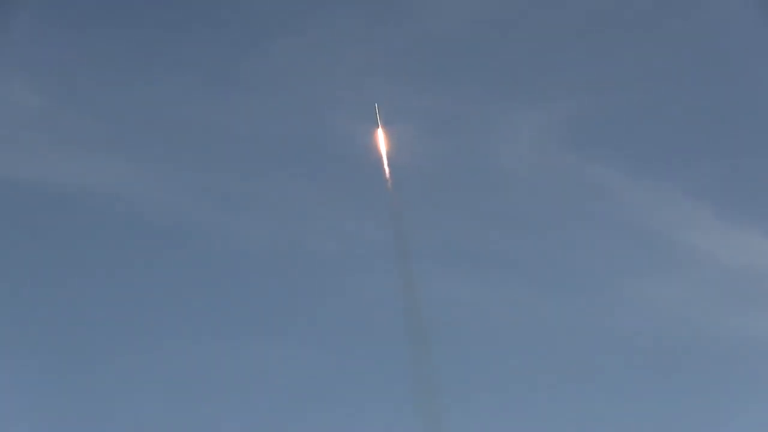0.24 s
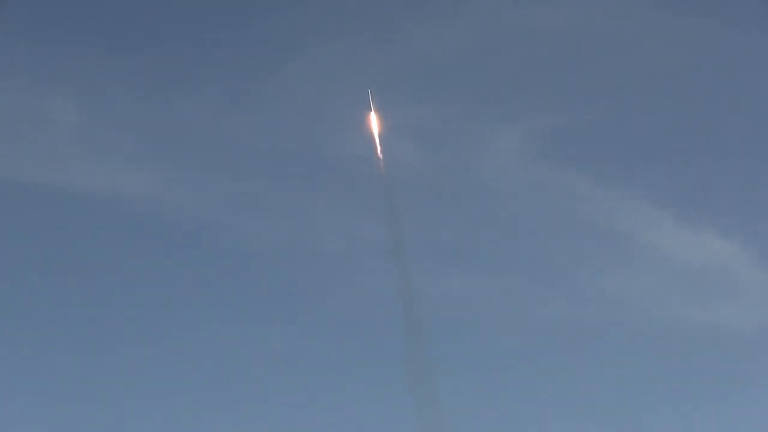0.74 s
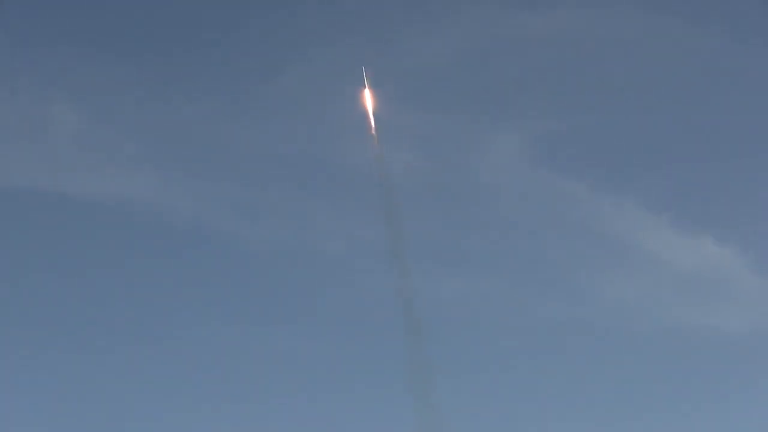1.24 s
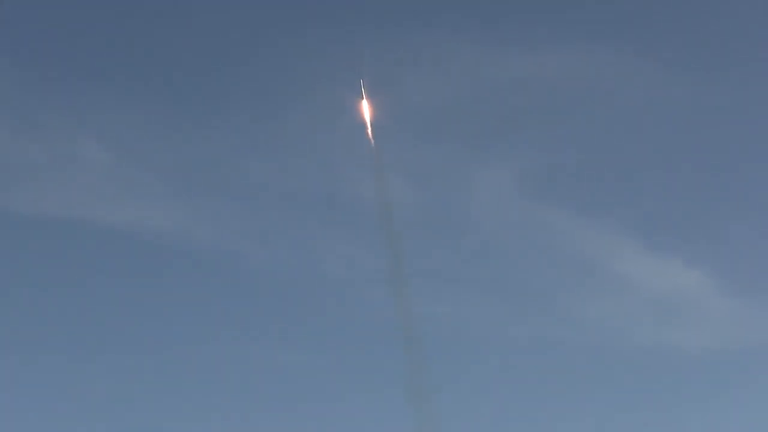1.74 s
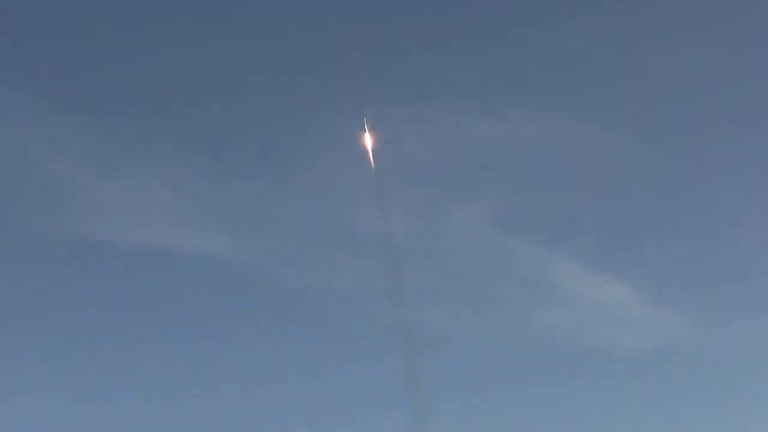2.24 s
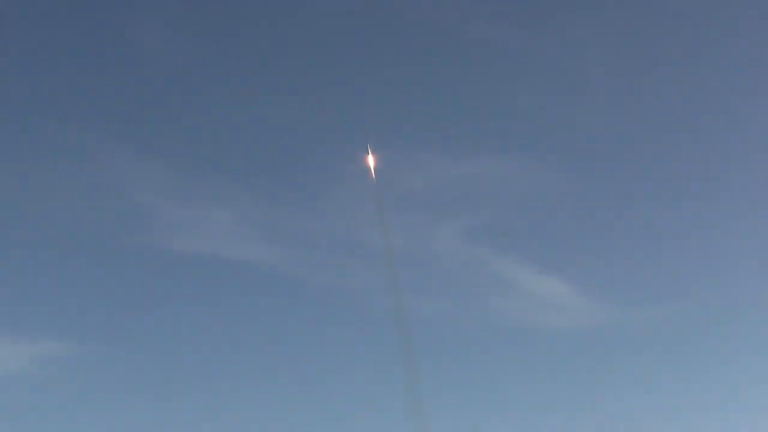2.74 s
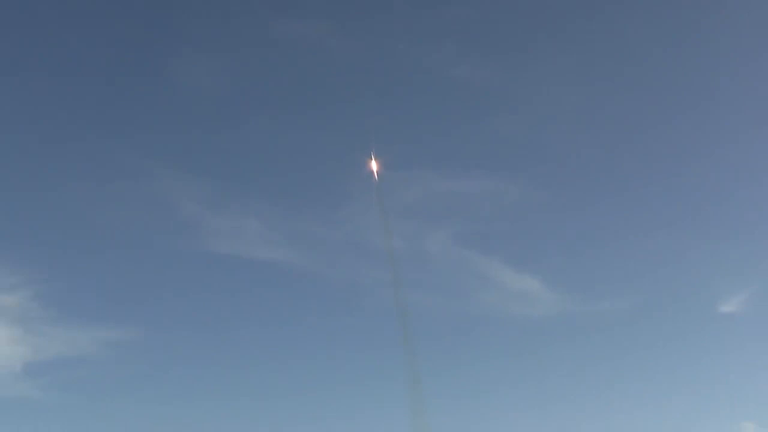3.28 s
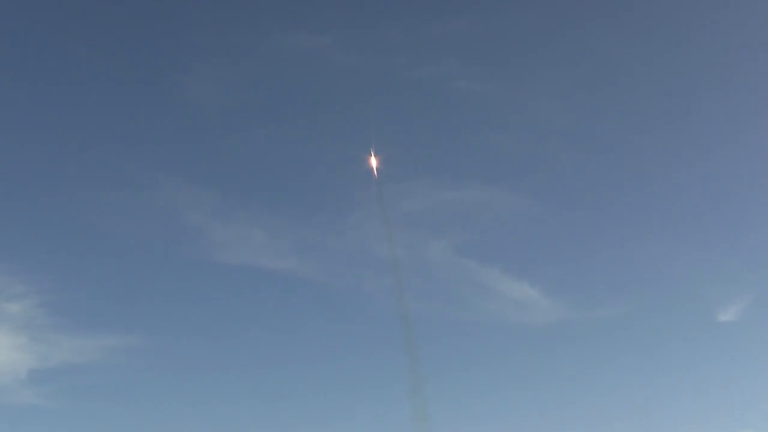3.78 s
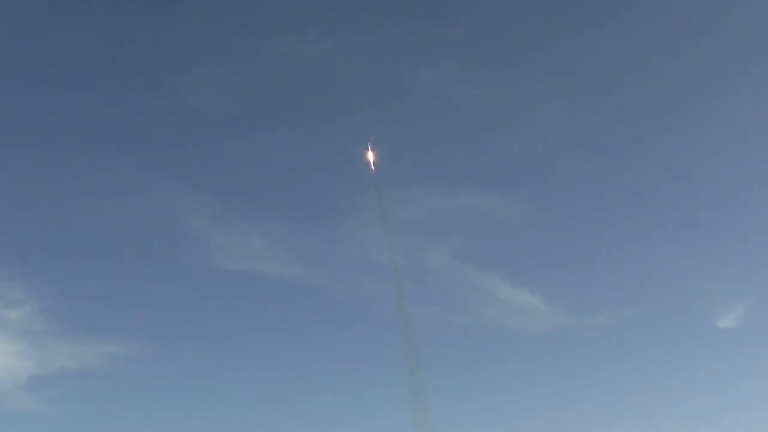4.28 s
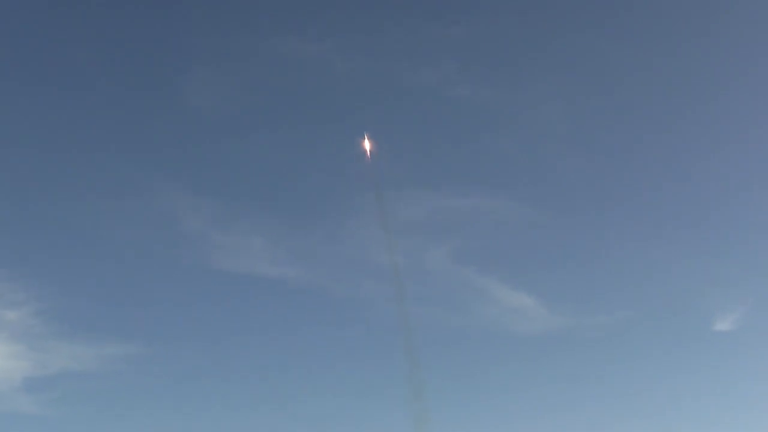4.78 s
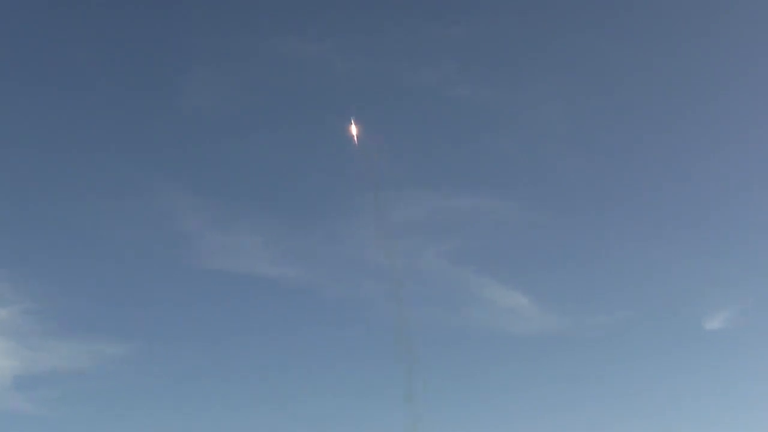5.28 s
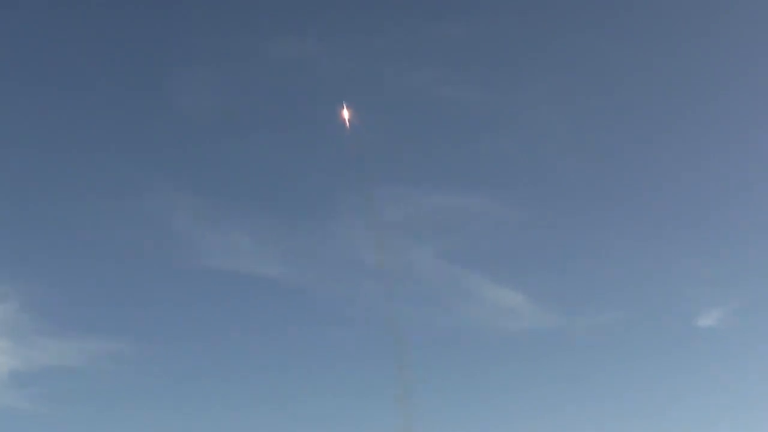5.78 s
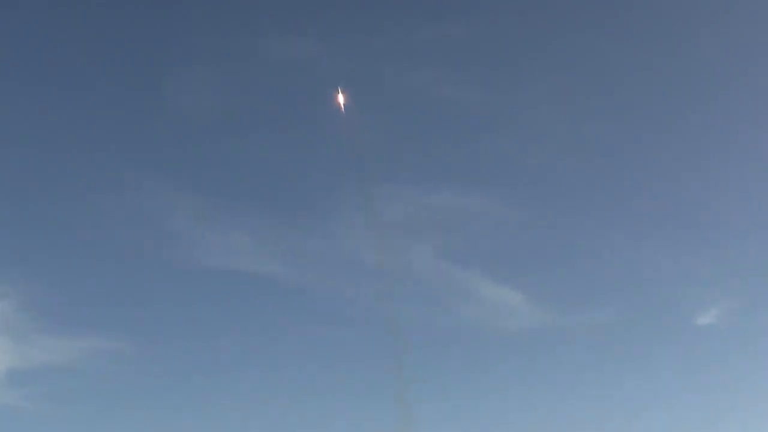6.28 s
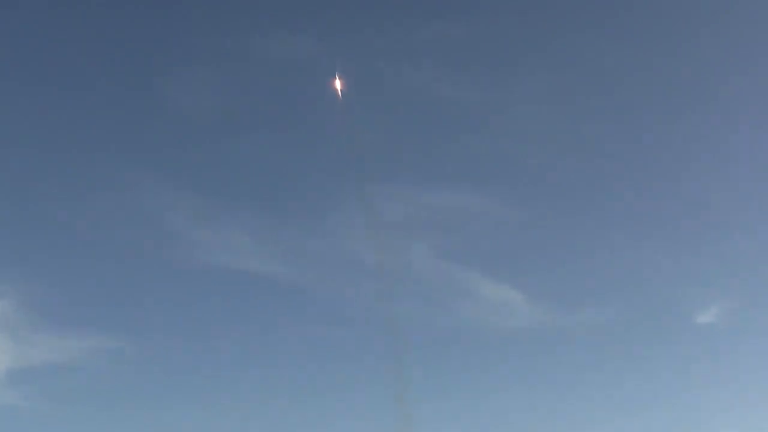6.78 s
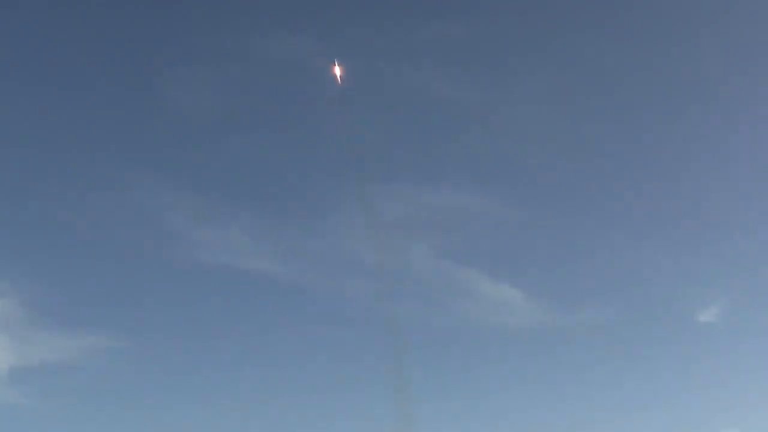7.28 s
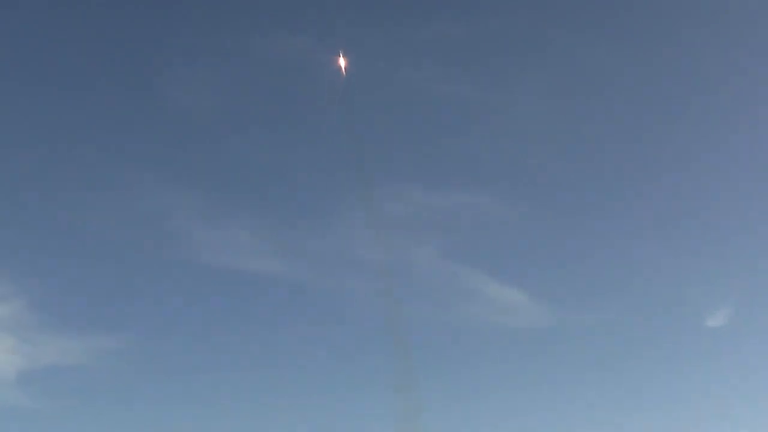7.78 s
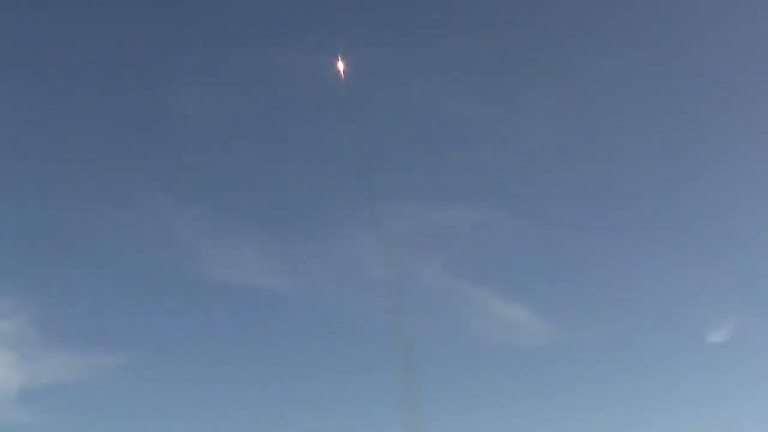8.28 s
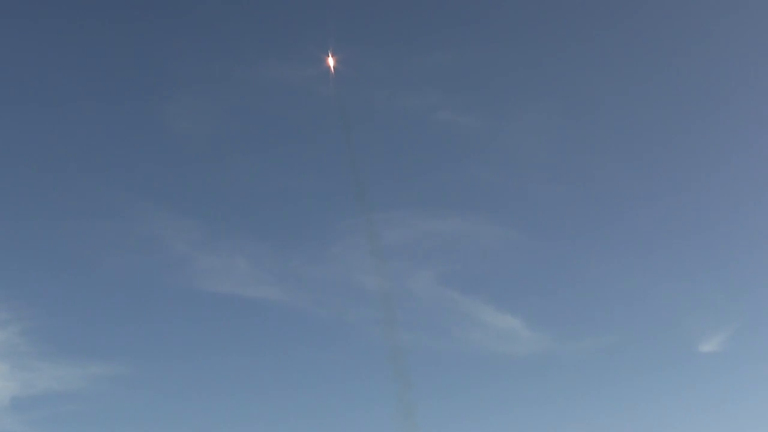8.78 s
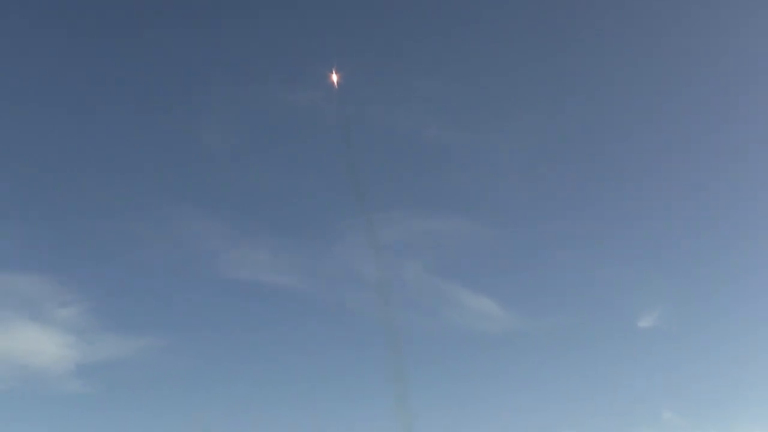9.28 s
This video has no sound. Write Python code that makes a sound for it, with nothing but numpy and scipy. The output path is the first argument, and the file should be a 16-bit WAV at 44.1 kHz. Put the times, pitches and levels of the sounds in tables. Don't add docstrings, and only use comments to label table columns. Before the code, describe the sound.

A rocket climbing far overhead outdoors: deep rumble and broad roar, with dense, irregular crackle building on top, then small plastic rattles near the end.

```python
import sys
import numpy as np
from scipy import signal
from scipy.fft import rfft, irfft, next_fast_len
from scipy.io import wavfile
from scipy.ndimage import uniform_filter1d, map_coordinates

SR = 44100
rng = np.random.default_rng(int(sys.argv[2]) if len(sys.argv) > 2 else 0)


def store_pcm(level_fs):
    pcm = np.round(np.clip(level_fs, -1, 1) * 32767).astype(np.int16)
    wavfile.write(sys.argv[1], SR, np.atleast_2d(pcm).T)


def magnitude_from_level(level_db):
    exponent = np.asarray(level_db, float) / 20
    return 10 ** exponent


N = 420273

# frequency in Hz, density in dB per Hz.
ROAR = [(120, -120), (170, -9.5), (240, -6), (330, 0.5), (450, -6), (700, -15), (1200, -21), (2000, -36.5),
        (3200, -50.5), (6000, -85), (16000, -110)]
# frequency in Hz, density in dB per Hz.
HISS = [(900, -120), (1800, 3.5), (4000, -7), (7000, -11), (11000, -20), (16000, -36)]
# start in s, jump in dB, rise time in ms.
STEEP_FRONTS = [(0.3252, 1.3, 0.77), (1.2904, 3.2, 0.314), (1.471, 1.5, 0.41), (1.5497, -2, 0.5),
                (1.5747, 1, 0.79), (1.671, 3.2, 0.83), (1.7076, 0.3, 0.37), (1.9733, 0, 0.31),
                (2.0037, -0.4, 0.25), (2.0716, -0.5, 0.31), (2.2344, -3, 0.31), (2.254, -5, 0.36),
                (2.2989, -3.5, 0.39), (2.4134, -3.5, 0.27), (2.4249, -2.5, 0.23), (2.4466, -5.5, 0.25),
                (2.4654, -5.5, 0.23), (2.497, -5, 0.36), (2.5122, -4.4, 0.22), (2.6686, -4.5, 0.37),
                (2.6836, -6, 0.21), (2.789, -5.5, 0.18), (2.8102, -8, 0.22), (2.841, -5.5, 0.16),
                (2.8522, -6, 0.15), (2.9419, -6.5, 0.19), (2.9635, -5, 0.17), (3.0035, -7, 0.18),
                (3.0149, -8.5, 0.16), (3.098, -5, 0.14), (3.2007, -7.5, 0.14), (3.2246, -6.5, 0.14),
                (3.2539, -6, 0.098), (3.3096, -8, 0.16), (3.338, -5, 0.14), (3.4196, -6.5, 0.15),
                (3.4608, -6.5, 0.13), (3.5198, -5.5, 0.14), (3.5676, -5, 0.22), (3.6686, -3, 0.3),
                (3.6978, -7.1, 0.19), (3.7187, -4, 0.37), (3.813, -3, 0.22), (3.851, -5.5, 0.16),
                (3.858, -5, 0.13), (3.869, -13, 0.11), (3.8913, -5.8, 0.21), (3.938, -3.5, 0.17),
                (3.981, -5, 0.34), (4.009, -3.7, 0.25), (4.0867, -10, 0.25), (4.1238, -4, 0.29),
                (4.1499, -2.5, 0.33), (4.2423, -2, 0.32), (4.3316, -2.5, 0.51), (4.3882, -3, 0.27),
                (4.4621, -2, 0.39), (4.5276, -3.5, 0.65), (4.5414, -3.6, 0.6), (4.5754, -2.9, 0.44),
              (4.6477, -2.5, 0.46), (4.7077, -2.5, 0.36), (4.734, -4, 0.36), (4.7655, -5, 0.54),
              (4.8103, -3, 0.33), (4.8384, -4.5, 0.5), (5.003, -3.5, 0.4), (5.0642, -2, 0.43),
              (5.1083, -5.5, 0.58), (5.152, -3.5, 0.39), (5.2081, -3, 0.27), (5.2999, -4, 0.25),
              (5.4264, -4, 0.25), (5.4478, -3, 0.32), (5.4974, -4.5, 0.31), (5.6392, -5.5, 0.15),
              (5.6676, -6, 0.24), (5.7629, -5.5, 0.19), (5.7939, -5.5, 0.26), (5.8709, -7.2, 0.19),
              (5.9309, -5.5, 0.23), (6.0504, -3, 0.66), (6.1732, -3, 0.11), (6.2376, -3.5, 0.12),
              (6.284, -5, 0.12), (6.5828, -7.5, 0.12), (6.6842, -5.5, 0.092), (6.7113, -6, 0.1),
              (6.7598, -5.5, 0.11), (6.8742, -7, 0.097), (6.9038, -9, 0.092), (6.9244, -7, 0.083),
              (7.0344, -8, 0.07), (7.107, -7.5, 0.069), (7.1595, -7.7, 0.06), (7.201, -7.5, 0.08),
              (7.2724, -7.5, 0.08), (7.3416, -7, 0.08), (7.4236, -6, 0.12), (7.4473, -7, 0.08),
              (7.5485, -6, 0.11), (7.5537, -6.5, 0.082), (7.9137, -5.5, 0.058), (7.9633, -3, 0.2),
              (7.9835, -7, 0.067), (8.0324, -10, 0.055), (8.2019, -5.5, 0.088), (8.2661, -6.5, 0.12),
              (8.3151, -7, 0.064), (8.4049, -8, 0.23), (8.6285, -8.3, 0.12), (8.8915, -5.5, 0.17)]
STEEP = STEEP_FRONTS
# start in s, jump in dB, rise time in ms.
SMALL_MIDDLE = [(2.383, -7, 0.45), (2.3896, -3, 0.81), (2.3926, -8, 0.8), (2.4003, -10, 0.38),
                (2.4339, -10, 0.39), (2.534, -5, 0.67), (2.5656, -9.1, 0.6), (2.5753, -6.5, 0.26),
                (2.5978, -9.0, 0.87), (2.6018, -6.4, 0.85), (2.6595, -3, 0.78), (2.6657, -14, 0.6),
                (2.7036, -7, 0.36), (2.7251, -8.5, 0.31), (2.75, -10, 0.31), (2.7783, -5.5, 0.66),
                (2.8047, -7, 0.25), (2.8854, -6.5, 0.5), (2.9253, -9.5, 0.29), (2.9987, -8.5, 0.2),
                (3.0407, -11.5, 0.23), (3.0637, -10, 0.18), (3.0731, -10, 0.25), (3.1388, -9.5, 0.2),
                (3.1689, -11.5, 0.22), (3.1859, -9, 0.2), (3.233, -21, 0.25), (3.2747, -10, 0.18),
                (3.325, -11.5, 0.28), (3.3518, -15, 0.14), (3.3672, -3, 0.26), (3.3936, -12.5, 0.16),
                (3.3984, -7, 0.22), (3.4477, -8.5, 0.65), (3.4729, -9, 0.29), (3.493, -10, 0.22),
                (3.547, -5, 0.42), (3.585, -8.5, 0.25), (3.6596, -5.5, 0.54), (3.74, -8.5, 0.22),
                (3.766, -7, 0.44), (3.772, -10.5, 0.14), (3.7765, -5.9, 0.31), (3.7989, -11, 0.28),
                (3.8477, -11, 0.18), (3.9091, -13, 0.26), (3.9874, -8, 0.46), (4.0177, -17, 0.34),
                (4.0467, -8.5, 0.62), (4.085, -4.5, 0.48), (4.0958, -8, 0.81), (4.1748, -4.5, 0.76),
                (4.258, -19, 0.33), (4.2834, -7.5, 0.37), (4.2858, -5.5, 0.59), (4.2957, -7, 0.47),
                (4.3071, -5, 0.58), (4.34, -12, 0.48), (4.4031, -6.5, 0.5), (4.4425, -5.5, 0.7)]
# start in s, jump in dB, rise time in ms.
SMALL_HIGH = [(4.5091, -7, 0.46), (4.5346, -8.7, 0.78), (4.5953, -11, 0.86), (4.606, -7, 0.55),
              (4.6208, -8, 0.84), (4.6252, -10, 0.95), (4.666, -6, 0.93), (4.6732, -7.5, 0.73),
              (4.752, -12, 0.64), (4.7943, -6.4, 0.67), (4.864, -11, 0.9), (4.8972, -7, 0.6),
              (4.954, -6, 1), (4.9768, -12, 0.85), (5.0184, -5.5, 0.46), (5.0884, -4.5, 0.51),
              (5.1771, -9.5, 0.6), (5.215, -10, 0.65), (5.24, -11.5, 0.45), (5.3933, -6.5, 0.52),
              (5.5264, -8.5, 0.88), (5.5569, -6.6, 0.41), (5.5806, -6.5, 0.3), (5.6203, -2, 0.78),
              (5.7046, -4.5, 0.77), (5.8094, -8, 0.26), (5.8278, -7.2, 0.53), (5.8577, -7, 0.72),
              (5.9066, -7.5, 0.55), (5.9698, -4.5, 0.42), (5.9817, -15, 0.76), (6.0195, -6.5, 0.39),
              (6.0385, -3.5, 0.7), (6.0584, -13.3, 0.25), (6.0631, -8.7, 0.28), (6.0738, -6.5, 0.22),
              (6.1247, -3, 0.65), (6.1513, -6.5, 0.28), (6.2148, -5.5, 0.55), (6.3753, -7.5, 0.44),
              (6.378, -12, 0.51), (6.3882, -4, 0.51), (6.4198, -7, 0.27), (6.4276, -7.9, 0.27),
              (6.4599, -7.5, 0.16), (6.4706, -9, 0.17), (6.5256, -8.7, 0.42), (6.5458, -8.9, 0.16),
              (6.564, -8.5, 0.14), (6.5648, -5, 0.81), (6.6469, -10.5, 0.21), (6.6671, -3.5, 0.79),
              (6.697, -9.5, 0.1), (6.7877, -10, 0.228), (6.8376, -12, 0.18), (6.867, -10, 0.41),
              (6.8749, -2, 0.81), (6.9695, -7, 0.6), (6.996, -8, 0.12), (7.0518, -9.5, 0.08)]
# start in s, jump in dB, rise time in ms.
SMALL_LATE = [(7.1414, -8, 0.11), (7.2442, -13, 0.093), (7.3087, -10.5, 0.1), (7.522, -8.5, 0.53),
              (7.5986, -5.6, 0.6), (7.615, -9.0, 0.12), (7.6413, -12, 0.15), (7.6548, -8, 0.17),
              (7.6826, -10.5, 0.11), (7.6829, -4, 0.78), (7.7096, -8, 0.11), (7.735, -11.0, 0.13),
              (7.7384, -6, 0.52), (7.7665, -10, 0.3), (7.781, -8.5, 0.22), (7.7948, -6.5, 0.4),
              (7.8286, -8, 0.49), (7.8612, -7.5, 0.6), (7.8805, -14.5, 0.16), (7.8874, -6.5, 0.17),
              (7.8924, -10, 0.17), (7.915, -8.5, 0.067), (7.948, -16, 0.46), (8.034, -7, 0.11),
              (8.0526, -9.5, 0.11), (8.0701, -18, 0.053), (8.0895, -17, 0.069), (8.0921, -5.5, 0.18),
              (8.1404, -5.5, 0.23), (8.1463, -10, 0.33), (8.1882, -10, 0.08), (8.3292, -7, 0.073),
              (8.3313, -10.5, 0.12), (8.372, -8.5, 0.31), (8.3821, -7.5, 0.46), (8.4417, -9.8, 0.39),
              (8.461, -8, 0.084), (8.4642, -5.5, 0.4), (8.478, -11, 0.18), (8.5464, -8.5, 0.15),
              (8.709, -7, 0.29), (8.7714, -8.5, 0.42), (8.7863, -12.5, 0.5), (8.877, -9.5, 0.46),
              (8.9854, -14.5, 0.17), (9.007, -14, 0.71), (9.1296, -8.1, 0.34), (9.1847, -10.6, 0.25),
              (9.1873, -8, 0.83), (9.2223, -11.5, 0.26), (9.228, -12, 0.31), (9.2313, -13, 0.76),
              (9.2981, -13, 0.21), (9.3138, -12.5, 0.22), (9.3301, -14, 0.16), (9.3426, -13, 0.22),
              (9.423, -15, 0.67), (9.47, -11.5, 0.69), (9.4854, -11, 0.26), (9.4983, -18, 0.53)]


def unit(x):
    return x / np.sqrt(np.mean(x ** 2) + 1e-20)


def curves(rows):
    s, *columns = np.transpose(rows)
    return [np.interp(np.arange(N) / SR, s, column) for column in columns]


def wobble(rate):
    knots = rng.standard_normal(int(N * rate / SR) + 4)
    return map_coordinates(knots, [np.arange(N) * rate / SR])


def dips(s, width_s, depth_db):
    t = np.arange(0, N / SR + .002, .001)
    bells = depth_db * np.exp(-((t[:, None] - s) / width_s) ** 2)
    return np.interp(np.arange(N) / SR, t, bells.sum(axis=1))


def filtered(x, response):
    m = next_fast_len(N + SR // 2)
    return irfft(rfft(x, m) * response(np.fft.rfftfreq(m, 1 / SR)), m)[..., :N]


def noise(spectrum):
    f, db = np.transpose(spectrum)
    colour = lambda hz: magnitude_from_level(np.interp(np.log(hz + 1), np.log(f + 1), db))
    return unit(filtered(rng.standard_normal(N), colour))


def jet_rumble(loud_db, eddies):
    # frequency in Hz, density in dB per Hz.
    rumble_spectrum = [(11, -36.5), (18, -4.5), (59, -2.5), (112, 0.5), (159, -2), (210, -10.5),
                       (260, -10.5), (340, -42.5), (570, -120)]
    # frequency in Hz, density in dB per Hz.
    deep_spectrum = [(12, -29.5), (22, -2.5), (45, -3), (70, 1.5), (120, -120)]
    deep = magnitude_from_level(np.linspace(-16, -5, N)) * noise(deep_spectrum)
    return magnitude_from_level(loud_db - 2.0 + 0.12 * eddies) * (noise(rumble_spectrum) + deep)


def jet_roar(loud_db, eddies):
    swing = 0.69
    roar_db = -27.5 + swing * (loud_db + 27.0) - np.linspace(-.5, .5, N)
    return magnitude_from_level(roar_db - 7.5 + 2.0 * eddies + 1.6 * wobble(40)) * noise(ROAR)


def jet_hiss(activity_db, usual_ms):
    hiss_db = -65 + 3.5 * activity_db + 2.6 * wobble(21)
    hiss = magnitude_from_level(hiss_db) * (.25 / usual_ms) ** 1.8 * noise(HISS)
    fizz = filtered(noise(HISS), lambda hz: 1 / (1 + (hz / 3600) ** 4))
    return hiss + magnitude_from_level(np.linspace(-65, -61, N)) * fizz


def fronts(s, jump, rise_ms):
    at = np.round(s * SR).astype(int)[:, None] + np.arange(-90, 91)
    half_s = np.clip(rise_ms, .03, .6)[:, None] / 2000
    slope = np.cosh((at / SR - s[:, None]) / half_s) ** -2.0
    slope *= (jump / slope.sum(axis=1))[:, None]
    steps = np.bincount(np.clip(at, 0, N - 1).ravel(), slope.ravel(), N)
    relax = lambda hz: SR / (2 * np.pi * (1j * hz + 183))
    bass_cut = lambda hz: (1j * hz + 27) / (1j * hz + 170)
    turn = lambda hz: (1j * hz - 117) / (1j * hz + 117)
    return filtered(steps, lambda hz: relax(hz) * bass_cut(hz) * turn(hz))


def lesser_fronts(activity_db, usual_ms, count=280):
    # start in s, jump in dB, rise time in ms.
    small_opening = [(0.0578, -11.5, 0.29), (0.1274, -21, 0.51), (0.1892, -7, 0.2), (0.2067, 0.5, 0.71),
                     (0.2604, -4, 0.39), (0.3017, -6, 0.44), (0.3158, -2, 0.71), (0.3282, -11.5, 0.81),
                     (0.3489, -7.5, 0.87), (0.3514, 0, 0.96), (0.354, -10, 0.96), (0.5528, -6.5, 0.28),
                     (0.5796, -16, 0.45), (0.582, -8, 0.36), (0.6129, -5.5, 0.67), (0.6594, -11.5, 0.3),
                     (0.7551, -13.5, 0.93), (0.8417, -1.5, 0.52), (0.8478, -5, 1), (0.8787, -3.5, 0.54),
                     (0.9338, -5.5, 0.73), (1.0178, 0, 0.97), (1.0446, -6.5, 0.44), (1.0932, -7.4, 0.44),
                     (1.096, -7.5, 0.94), (1.1885, -4.5, 1), (1.2566, -8, 0.82), (1.2594, -2.5, 0.55),
                     (1.2835, 0, 0.6), (1.3174, -10, 0.54), (1.323, -3.5, 0.7), (1.3581, -2, 0.6),
                     (1.419, -11, 0.42), (1.5388, -10, 0.6), (1.564, -4.5, 0.49), (1.5956, -4, 0.75),
                     (1.6017, -4, 0.85), (1.6363, -4, 0.6), (1.6571, 2.5, 1), (1.7029, 1, 0.71),
                     (1.7565, -8.5, 0.84), (1.7873, -3, 0.69), (1.8398, -7.5, 0.88), (1.8541, -1, 1),
                     (1.8738, -4.5, 0.93), (1.8876, -8.3, 1), (1.8929, -0.5, 0.97), (1.9115, -4.5, 0.54),
                     (1.9157, -4, 0.98), (1.9608, -1, 1), (2.0351, -6, 0.66), (2.0662, -9.2, 0.63),
                     (2.1268, -3.5, 0.7), (2.14, -9.5, 0.44), (2.1799, -3.5, 0.6), (2.1875, -11, 0.6),
                     (2.2117, -11, 0.37), (2.3159, -12, 0.66), (2.3369, -10, 0.36), (2.3653, -2.5, 1)]
    when, size, blunt = rng.random(count), *rng.standard_normal((count, 2)).T
    s = (np.arange(count) + when) / count * (N - 1) / SR
    small = np.transpose(small_opening + SMALL_MIDDLE + SMALL_HIGH + SMALL_LATE)
    at = (s * SR).astype(int)
    jump_db = -20.5 + activity_db[at] + 3 * np.minimum(size, 1)
    lull_blunting_db = -0.68 * np.minimum(activity_db[at], 0)
    rise_ms = usual_ms[at] * magnitude_from_level(7.5 * np.abs(blunt) + lull_blunting_db)
    ahead_s = np.concatenate([np.transpose(STEEP)[0], small[0]]) - s[:, None]
    crowded = ((ahead_s > -.0074) & (ahead_s < .021)).any(axis=1)
    return np.hstack([np.array([s, jump_db, rise_ms])[:, ~crowded], small])


def crackle(activity_db, usual_ms):
    # time in s, share of the sharp lip in dB.
    lip_share = [(0, -21), (1.7, -20.5), (2.15, -10), (2.5, -21), (3.5, -27), (4, -6), (5.5, -8),
                 (6.2, -39.5)]
    # start in s, level in dB.
    thin_edges = [(1.971, -67), (2.0023, -71), (2.0707, -69), (2.302, -66), (2.9625, -63), (3.096, -56),
                  (3.2225, -55), (3.252, -42), (3.3368, -63), (3.419, -64), (3.4595, -56), (3.52, -49),
                  (3.697, -52), (3.7444, -69), (3.8132, -66), (3.8573, -34.5), (3.8906, -52), (3.9384, -52),
                  (3.9809, -58), (4.0083, -63), (4.0843, -45.5), (4.1235, -65), (4.152, -36), (4.2407, -49),
                  (4.3905, -45), (4.4603, -63), (4.573, -46), (4.7077, -54), (4.793, -43), (5.0613, -67),
                  (5.0848, -49), (5.2078, -42), (5.3015, -53), (5.3972, -45), (5.449, -56), (5.639, -62),
                  (5.763, -55), (5.909, -45.5), (5.93, -44), (5.9713, -39), (7.697, -45), (8.922, -41)]
    s, jump_db, rise_ms = np.hstack([np.transpose(STEEP), lesser_fronts(activity_db, usual_ms)])
    lip = magnitude_from_level(np.interp(s, *np.transpose(lip_share)))
    edge_s, edge_db = np.transpose(thin_edges)
    edge_ms = 0.043 + 0 * edge_s
    times = np.concatenate([s, s - .00008, edge_s])
    jumps = np.concatenate([magnitude_from_level(jump_db) * (1 - lip), magnitude_from_level(jump_db) * lip, magnitude_from_level(17.5 + edge_db)])
    return fronts(times, jumps, np.concatenate([0.93 * rise_ms, 0.41 * rise_ms, edge_ms]))


def fine_crackle(activity_db, count=3000):
    level_db = -44 + 0.4 * activity_db
    when, size, blunt = rng.random((count, 3)).T
    size_db = -4.2 * np.log(1 - .8 * size)
    rise_ms = 0.44 * magnitude_from_level(-.3 * size_db + 11.0 * (blunt - 0.5))
    weak = fronts(when * N / SR, magnitude_from_level(size_db), rise_ms)
    edge = filtered(weak, lambda hz: (hz > 1000) & (hz < 3000))
    return magnitude_from_level(level_db - 5.0) * weak / np.std(edge)


def wake():
    rise_s, fade_s = .001, 0.0084
    s, db, _ = np.transpose(STEEP + SMALL_MIDDLE + SMALL_HIGH + SMALL_LATE)
    starts = np.bincount((s * SR).astype(int), magnitude_from_level(db), N)
    lag = lambda hz, seconds: 1 / (1 + 2j * np.pi * hz * seconds)
    fade = filtered(starts, lambda hz: SR * fade_s * lag(hz, fade_s) * lag(hz, rise_s) ** 2)
    burst = magnitude_from_level(-24) * fade * (noise(ROAR) + magnitude_from_level(-22) * noise(HISS))
    return filtered(burst, lambda hz: 1 / (1 + 1j * hz / 4670) ** 4)


def scatter(x):
    t = np.arange(SR // 5) / SR
    near = magnitude_from_level(-60 * t / 0.037)
    far = magnitude_from_level(-20.5 - 60 * t / 0.22)
    tail = unit(np.diff(rng.standard_normal(len(t) + 1))) * (near + far)
    return x + magnitude_from_level(-25.5) * signal.fftconvolve(x, tail)[:N]


def ground(x):
    # time in s, extra path in ms.
    reflected_path = [(0, 1.48), (2, 1.346), (3.2, 1.39), (4.2, 1.444), (5.2, 1.576), (6.2, 1.725),
                      (7.2, 1.87), (8.2, 2.11), (9.53, 2.42)]
    late = lambda v, ms: map_coordinates(v, [np.arange(N) - ms * SR / 1000], order=3)
    dull = lambda top_hz: filtered(x, lambda hz: 1 / (1 + 1j * hz / top_hz) ** 2)
    path_ms = curves(reflected_path)[0]
    extra_ms = path_ms * (1 + 0.031 * wobble(25))
    hard = 0.31 * late(x, extra_ms)
    soil_gain = np.clip(np.linspace(1.45, .05, N), 0, 1.05)
    soil = soil_gain * late(dull(top_hz=433), 1.0 * extra_ms + 1.05)
    deep = -1.26 * late(dull(top_hz=147), 3.487 * path_ms - 2.52)
    return x + hard + soil + deep


def rattle():
    # start in s, level in dB, frequency in Hz, time to fall 60 dB in s.
    shell_rings = [
        (8.772, -60, 5400, 0.088),
        (8.982, -42, 5800, 0.03),
        (8.982, -45, 4650, 0.036),
        (9.175, -61.5, 4250, .08),
        (9.301, -51, 5900, 0.065),
        (9.333, -51, 5950, 0.059),
        (9.372, -66, 3620, 0.59),
        (9.41, -64.5, 4700, 0.43),
        (9.44, -61.5, 3580, 0.44),
        (9.487, -72, 4700, .3),
    ]
    out, t = np.zeros(N + SR), np.arange(SR // 6) / SR
    for s, db, hz, t60 in shell_rings:
        fuzz = 1 + 0.61 * unit(uniform_filter1d(rng.standard_normal(len(t)), size=200))
        envelope = magnitude_from_level(db - 60 * t / t60) * (1 - np.exp(-t / .004))
        out[round(s * SR):][:len(t)] += envelope * fuzz * np.sin(2 * np.pi * hz * t)
    return out[:N]


def scene():
    # time in s, jet loudness in dB, crackle activity in dB, usual rise time in ms.
    climb = [(0, -19, -16.5, 0.61), (.25, -18, -6.5, 0.43), (1, -18.5, -14.5, 0.24),
             (1.75, -19.5, 1.5, 0.88), (2.1, -23.5, -0.5, 0.26), (2.8, -29, 0, 0.56),
             (3.3, -31.5, -3.5, 0.21), (3.9, -30, -0.5, 0.22), (4.5, -33.5, 1.5, 0.32),
             (5.1, -31, 2.5, 0.29), (5.5, -27, -1.5, 0.32), (5.9, -26, 1, 0.25), (6.35, -25.5, 0, 0.25),
             (6.8, -25, -1, 0.14), (7.15, -28.5, -3.5, 0.097), (7.55, -27.5, 0.5, 0.15),
             (8.05, -29, 1, 0.12), (8.55, -30, -0.5, 0.13), (8.72, -32.5, -8.5, 0.3),
             (9.0, -27, -1.5, 0.45), (9.25, -24, -0.5, 0.24), (9.53, -24, 2, 0.29)]
    # middle in s, half length in s, activity change in dB.
    lulls = [
        (2.88, 0.055, -11),
        (3.62, 0.013, -8.5),
        (4.203, 0.047, 0.5),
        (4.927, 0.038, -7.5),
        (6.343, 0.017, 1),
        (7.842, 0.046, -2.5),
    ]
    loud_db, activity_db, usual_ms = curves(climb)
    activity_db = activity_db + dips(*np.transpose(lulls))
    hush = magnitude_from_level(dips(np.transpose(STEEP)[0] - 0.008, 0.006, -3.5))
    eddies = wobble(9)
    rumble = jet_rumble(loud_db, eddies)
    roar = jet_roar(loud_db, eddies)
    hiss = jet_hiss(activity_db, usual_ms)
    shocks = crackle(activity_db, usual_ms) + hush * fine_crackle(activity_db)
    reflected = ground(scatter(shocks) + hush * (roar + hush ** 2 * hiss))
    return (reflected + rumble + rattle() + wake())[None]


def kept(x, floor_db, size):
    hz, _, z = signal.stft(x, SR, nperseg=size)
    power = np.abs(z) ** 2
    loud = uniform_filter1d(power.sum(axis=0), size=SR // size)
    floor = magnitude_from_level(2 * (floor_db - .5 * hz[:, None] / 1100)) * (loud / loud.mean()) ** 0.89
    level = uniform_filter1d(power, size=size // 100, axis=0)
    keep = np.cumsum((level > floor)[::-1], axis=0)[::-1] > 0
    return signal.istft(z * keep, nperseg=size)[1][:N]


def treble_gate(x):
    steady = kept(x, floor_db=-78.0, size=1152)
    treble = filtered(x, lambda hz: hz > 2000) ** 2
    brief = np.abs(uniform_filter1d(treble, size=200))
    surge = brief / np.abs(uniform_filter1d(treble, size=1500) + 1e-12)
    sudden = uniform_filter1d(1.0 * (surge > 4.8), size=300) > 0
    tops = kept(x - steady, floor_db=-81, size=384)
    return steady + uniform_filter1d(1.0 * sudden, size=120) * tops


def roll_off(x):
    return signal.sosfilt(signal.butter(12, 15870, fs=SR, output="sos"), x)


def record(dry):
    cut = filtered(dry[0], lambda hz: 1j * hz / (1j * hz + 8))
    limited = cut / (1 + np.abs(cut / .37) ** 6) ** (1 / 6)
    fade_out = np.clip(np.arange(N)[::-1] / 300, 0, 1)
    return roll_off(treble_gate(limited * fade_out)[None])


dry = scene()
out = record(dry)
store_pcm(out)
```